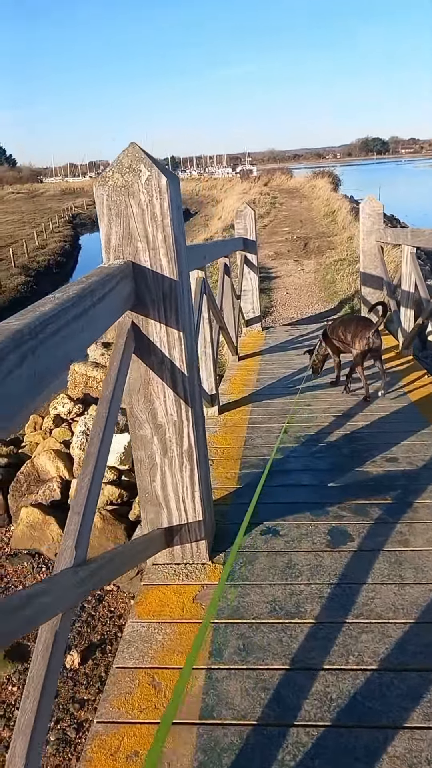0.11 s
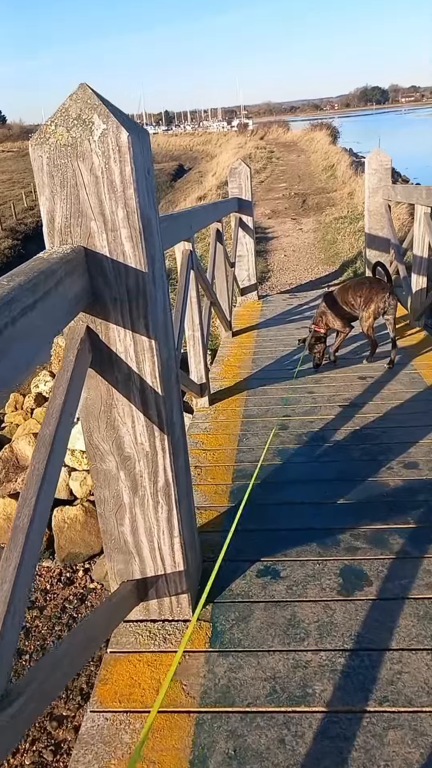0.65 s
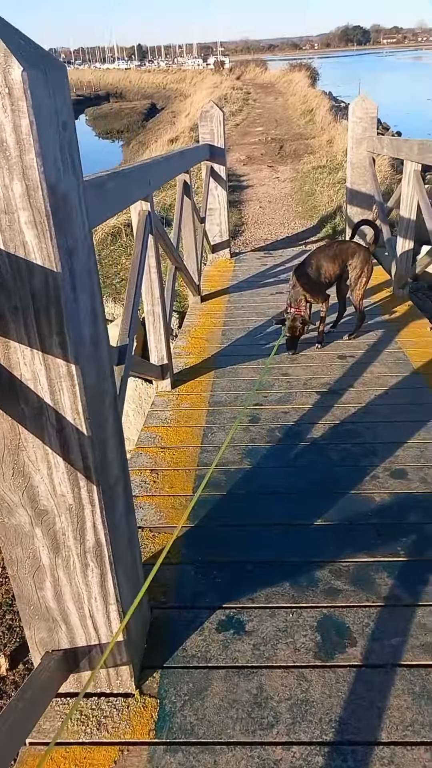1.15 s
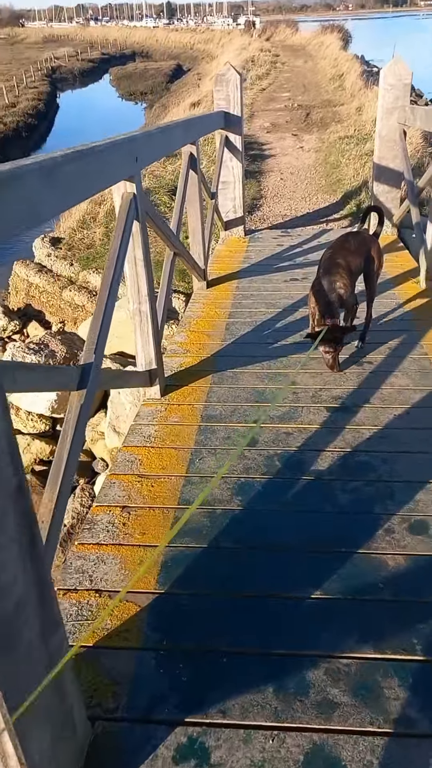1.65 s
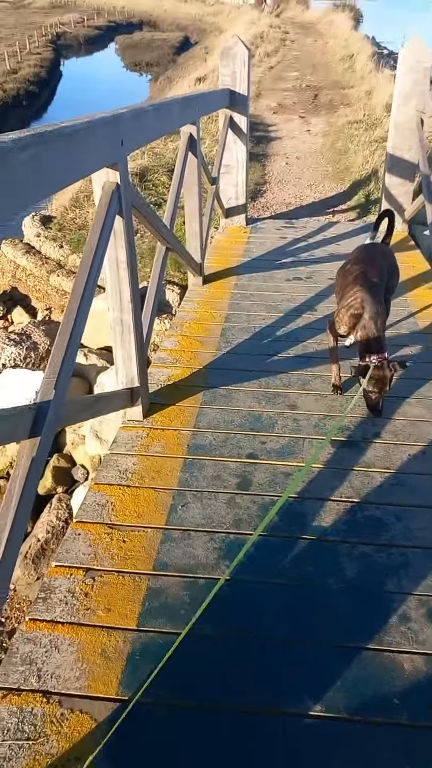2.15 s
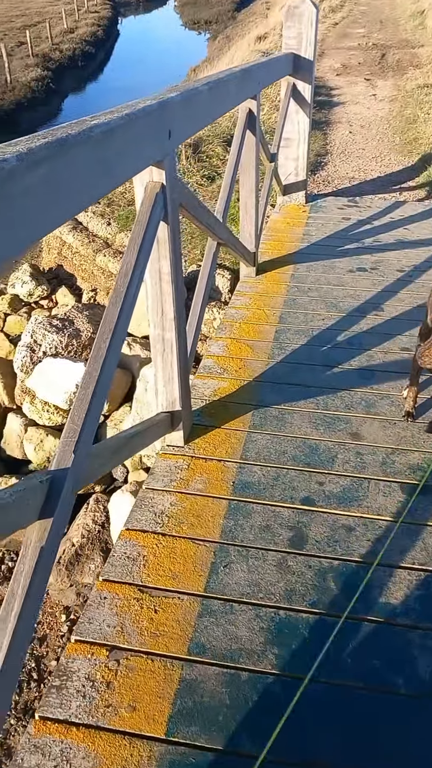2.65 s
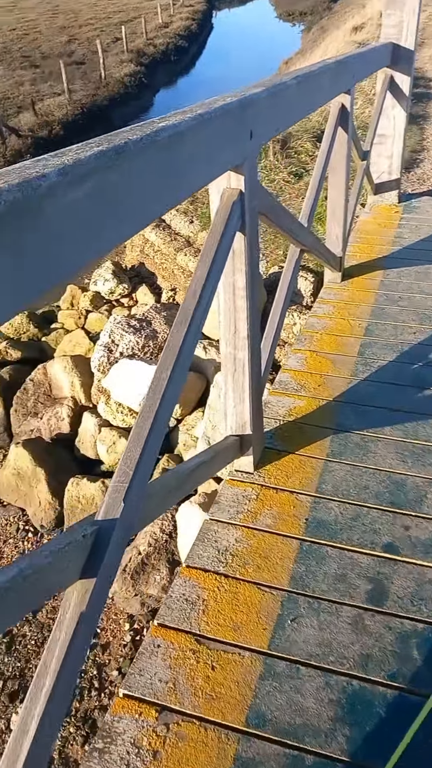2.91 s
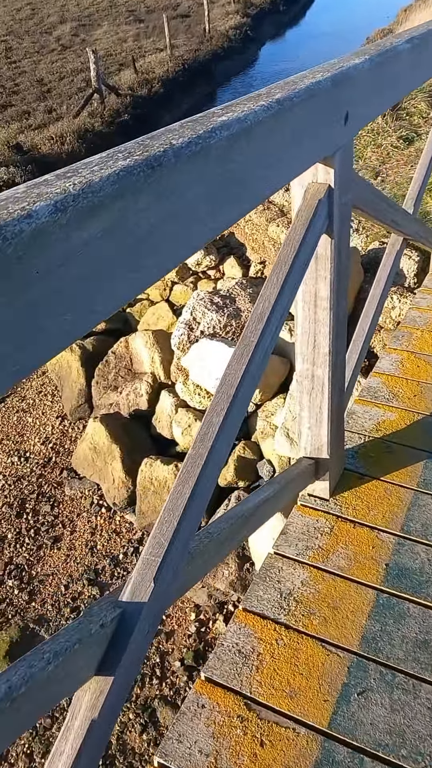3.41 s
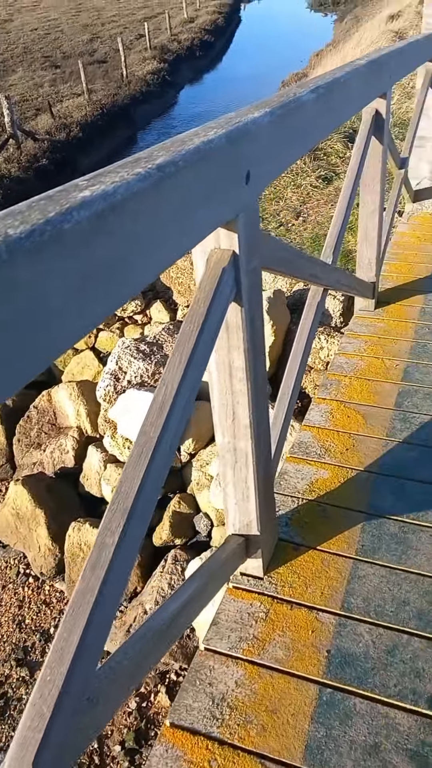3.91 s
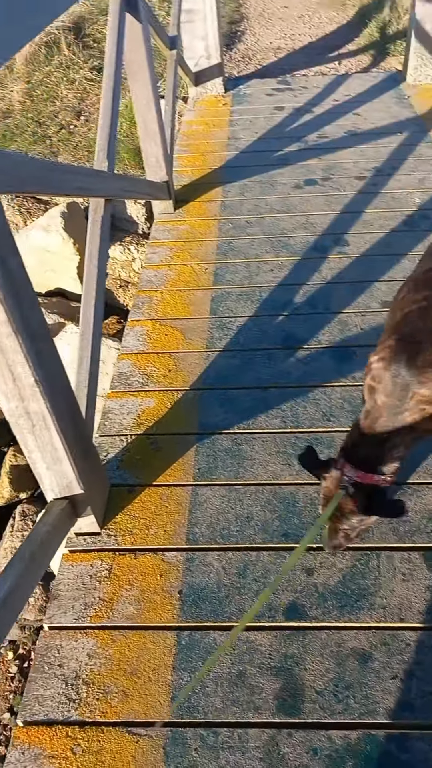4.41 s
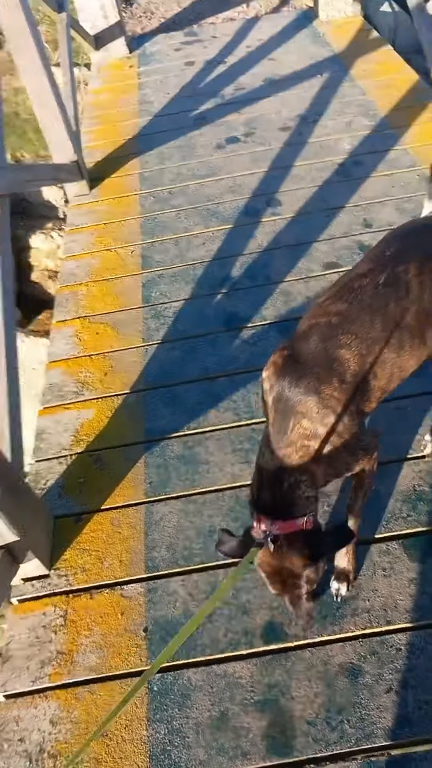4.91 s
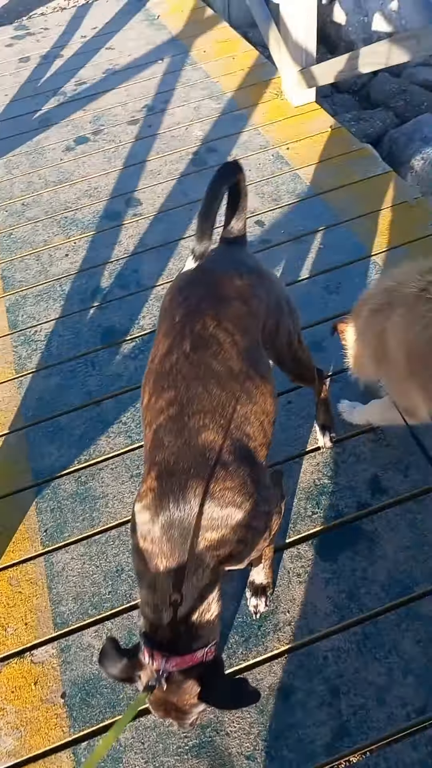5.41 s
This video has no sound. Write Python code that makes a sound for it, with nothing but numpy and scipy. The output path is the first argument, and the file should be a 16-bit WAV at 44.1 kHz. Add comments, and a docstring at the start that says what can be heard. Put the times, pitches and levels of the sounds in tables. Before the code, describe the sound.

Handheld close stereo sound, shaded on the left: hissy fabric and gritty scuffing stop and start over a faint low outdoor hum. Boards thud softly underfoot, a dog's claws and metal clasp click, and one claw scrapes finely before two seconds. Distant piping birds are heard early. After a sparser middle, heavy rubbing dominates late, then falls away, leaving faint paw taps and a crisp click.

```python
"""A walker follows a dog over a wooden footbridge: two microphones, the left shaded, so later and duller.
From the start cloth and soles rub as swelling friction noise, and planks thud as damped modes over a low outdoor hum.
Next thin whistles, perhaps shore birds, glide as sines over a blur of band noise; claws and the lead's clasp tick
as struck resonances. About a third of the way in a claw drags as ringing grains; paws tap paired board modes
then and again later. The whistles fade out, and the rubbing is strongest late."""
import sys
import numpy as np
from scipy import signal
from scipy.fft import rfft, irfft, next_fast_len
from scipy.io import wavfile
from scipy.ndimage import uniform_filter1d, map_coordinates

SR = 44100
rng = np.random.default_rng(int(sys.argv[2]) if len(sys.argv) > 2 else 0)


def decibels_to_gain(level_db):
    """Convert a level in decibels to a linear amplitude gain (20 dB per decade)."""
    exponent = np.asarray(level_db, float) / 20
    return 10 ** exponent


def store_pcm(level_fs):
    """Save levels as 16-bit WAV."""
    pcm = np.round(np.clip(level_fs, -1, 1) * 32767).astype(np.int16)
    wavfile.write(sys.argv[1], SR, np.atleast_2d(pcm).T)


N = 244755

# Footfalls on the planks: start_s, level_db, pitch_hz, rattle_db (over the thud)
FOOTFALLS = [(0.021, -41.5, 227, -30), (0.7393, -45, 254, -10.5), (0.763, -46, 214, -20),
             (0.799, -58, 120, 2), (1.551, -54.5, 193, -9), (2.1907, -47.5, 431.4, -8.5),
             (2.208, -49.5, 202, -15), (2.237, -52, 205, -18), (2.754, -46, 86, -20),
             (2.787, -46.5, 98, -15.5), (4.036, -53, 180, -13), (5.344, -57.5, 76.5, -18)]
BRISK_DB = -58.5  # hiss level of a brisk stroke, the reference for colour and loading


def unit(x):
    """Normalization: scales a signal to rms 1."""
    return x / np.sqrt(np.mean(x ** 2) + 1e-20)


def along(points, hz):
    """Spectral envelope: interpolates (frequency_hz, value) points on a log-frequency axis."""
    point_hz, value = np.transpose(points)
    return np.interp(np.log(hz + 1), np.log(point_hz + 1), value)


def curves(rows, **ends):
    """Linear interpolation: one value per sample for each column after the time."""
    time_s, *columns = np.transpose(rows)
    return [np.interp(np.arange(N) / SR, time_s, column, **ends) for column in columns]


def wobble(rate_hz):
    """Slow random modulation: a smooth curve through normal random knots, rate_hz of them a second."""
    knots = rng.standard_normal(int(N * rate_hz / SR) + 4)
    return map_coordinates(knots, [np.arange(N) * rate_hz / SR])


def filtered(x, response):
    """Linear filtering: multiplies the spectrum by a complex response of frequency."""
    size = next_fast_len(x.shape[-1] + 4096)
    spectrum = rfft(x, size) * response(np.fft.rfftfreq(size, 1 / SR))
    return irfft(spectrum, size)[..., :x.shape[-1]]


def resonance(hz, width_hz):
    """Damped oscillator: a causal band-pass response of peak gain 1."""
    return lambda f: 1j * f * width_hz / (hz * hz - f * f + 1j * f * width_hz)


def ramp(start_s, stop_s, rise_per_s, fall_per_s):
    """Piecewise-linear envelope: 0 between two times, sloping downward before and after."""
    t = np.arange(N) / SR
    return -rise_per_s * np.maximum(start_s - t, 0) - fall_per_s * np.maximum(t - stop_s, 0)


def to_left(x, lag_s=0.000362):
    """Acoustic shadow: the longer path delays the sound and the shade dulls it."""
    # Left over right: frequency_hz, level_db
    shade = [(100, 0.5), (400, -2), (1300, -3), (2400, -2.5), (4400, -7), (8000, -10.5), (8800, -7),
             (10000, -25), (15000, -19)]
    return filtered(x, lambda hz: decibels_to_gain(along(shade, hz)) * np.exp(-2j * np.pi * hz * lag_s))


def rush(spectrum, grain_db):
    """Partly coherent noise: uneven tiny grains at both microphones, whose mean has rms 1."""
    # Left-right likeness before the shading: frequency_hz, coherence (0 to 1)
    alike = [(100, .92), (600, .78), (1500, .68), (2700, .4), (4000, .24), (15000, .12)]
    grain_gain = decibels_to_gain(grain_db * (wobble(350) + 1.08 * wobble(14)))
    right, other = rng.standard_normal((2, N)) * grain_gain

    def shared(hz):
        return np.clip(along(alike, hz), 0, 1)

    common = filtered(right, shared)
    separate = filtered(other, lambda hz: np.sqrt(1 - shared(hz) ** 2))
    left = to_left(common + separate)
    pair = filtered(np.array([left, right]), lambda hz: decibels_to_gain(along(spectrum, hz)))
    return pair / np.sqrt(np.mean(pair.mean(0) ** 2))


def rubbing(hiss_db, body_db):
    """Friction noise: cloth and soles catch and slip, swaying five bands and sparse grit together."""
    # Bands of the friction noise: frequency_hz, level_db
    hiss_bands = [(1200, -28.5), (2400, -16), (3300, -10), (4200, -6.5), (5300, -12), (6500, -4.5),
                  (7700, -1.5), (8300, -7), (9000, -48), (11000, -12.5)]
    body_bands = [(150, -33), (280, -12.5), (580, 3), (1000, 1.5), (1350, 2.5), (2000, -17.5)]
    rasp_bands = [(1100, -19.5), (1500, 0), (1900, -2), (2600, -3), (3300, -6), (4500, -21)]
    fizz_bands = [(7000, -40), (8800, -9), (10500, -7), (12000, -4), (13400, 0), (14500, -1.5),
                  (15600, -1.5)]
    swish_bands = [(3300, -46), (4300, -1), (5200, 3.5), (6000, 0.5), (7000, -6)]
    # Cloth turning against the microphone:
    # time_s, fizz_db and swish_db (over the hiss, for a brisk stroke), rasp_db (over the body)
    cloth_turn = [(0.0, 3, 8, 10), (.12, -1.5, -2.5, 0), (.28, -3, 5.5, 5.5), (.5, -5, -4, 0.5),
                  (.75, 0.5, -4, 2), (1.1, 0, -4, 5), (1.9, 1.5, -2.5, 1.5), (2.2, 1.5, -8.5, 0.5),
                  (2.5, -6, 3, 4), (2.8, 1.5, -3.5, 2), (3.15, 5, -2.5, 4), (3.4, -3, -4.5, -8),
                  (3.7, 3.5, -1, 5), (3.95, 3, -4, 6), (4.5, 0.5, -3.5, -1.5), (5.5, 6, 0.5, -1)]
    fizz_db, swish_db, rasp_db = curves(cloth_turn)
    over_brisk_db = hiss_db - BRISK_DB
    fizz_db = fizz_db + 0.2 * over_brisk_db  # stronger strokes fizz more
    swish_db = swish_db - 0.17 * over_brisk_db  # and swish less
    catch_db = 0.75 * wobble(30) + 0.9 * wobble(90)

    body = rush(body_bands, grain_db=0.5) + decibels_to_gain(rasp_db) * rush(rasp_bands, grain_db=1.6)
    parts = rush(hiss_bands, grain_db=1.0) + decibels_to_gain(body_db - hiss_db - 3.5) * body
    parts += decibels_to_gain(fizz_db) * rush(fizz_bands, grain_db=-0.5)
    parts += decibels_to_gain(swish_db) * rush(swish_bands, grain_db=1.0)

    # Single grains of sand crack, about 120 a second
    cracks = (rng.random(N) < 120 / SR) * rng.standard_normal(N)
    grit = 0.17 * unit(filtered(cracks, lambda hz: decibels_to_gain(along(hiss_bands, hz))))
    return decibels_to_gain(hiss_db + catch_db) * (parts + [to_left(grit), grit])


def strokes():
    """Power addition: levels in dB of hiss and body, all strokes over a rustle that never stops."""
    # Strokes that swell or sink, then stop short:
    # stop_s, hiss_db (at the stop), length_s, swell_db, body_db (over the hiss)
    stroke_rows = [(0.105, -46, 0.074, 6, -10), (0.174, -49, 0.05, -1.5, -7.5), (0.391, -50, 0.18, 5.5, -4),
                   (0.487, -62, 0.064, -3.5, 0), (0.804, -45.5, 0.19, 16, -12),
                   (1.016, -64, 0.086, -2, -4.5), (1.246, -66, 0.22, -2, -6),
                   (1.481, -46.5, 0.19, 15, -16.5), (1.545, -57, 0.031, -7.5, -13),
                   (1.723, -57.5, 0.069, 5, -7.5), (1.806, -56.5, 0.025, 2.5, -4),
                   (2.21, -50, 0.31, 16.5, -8), (2.5, -54, 0.18, 4.5, -8.5),
                   (2.63, -68.5, 0.072, -6.5, -5.5), (2.82, -52.5, 0.065, 13, -13),
                   (3.02, -60, 0.15, 11, -13), (3.224, -65.5, 0.072, -4, -20),
                   (3.918, -46.5, 0.23, 13, -10.5), (4.106, -44.5, 0.062, 5, -9),
                   (4.346, -42.5, 0.2, 3.5, -8), (4.758, -42.5, 0.43, 2, -7), (4.913, -50.5, 0.14, 4, -1),
                   (5.263, -70, 0.22, 0, -11), (5.372, -67, 0.082, 0.5, -2)]
    onset_db_per_s, lift_db_per_s = 205, 255
    rest_db, rest_body_db = -69.5, -6  # hiss of the resting rustle, and its body over that hiss
    hiss_power, body_power = decibels_to_gain(2 * rest_db), decibels_to_gain(2 * (rest_db + rest_body_db))
    for stop_s, stop_db, length_s, swell_db, body_db in stroke_rows:
        to_go = np.clip((stop_s - np.arange(N) / SR) / length_s, 0, 1)
        slopes_db = ramp(stop_s - length_s, stop_s, onset_db_per_s, lift_db_per_s)
        power = decibels_to_gain(2 * (stop_db - swell_db * to_go + slopes_db))
        hiss_power = hiss_power + power
        body_power = body_power + power * decibels_to_gain(2 * body_db)
    return 10 * np.log10(hiss_power), 10 * np.log10(body_power)


def ticks():
    """Impulse response: a sharp blow and its grit ring, with a bright edge and a wooden knock."""
    # Claw and clasp ticks: start_s, ring_peak_db, pitch_hz,
    # scatter_db and knock_db (relative settings, each offset below)
    tick_rows = [(0.743, -26, 6300, -16, -9), (0.982, -37, 4330.0, -20, -3),
                 (1.0128, -29.5, 5100, -15, -28), (1.0615, -33, 5940, -3, -13),
                 (1.086, -37, 4360, -13, -13), (1.6962, -28.5, 6300, -13, -11),
                 (1.7044, -31, 7110.0, -19, -13), (1.709, -39, 6280.0, -21, -20),
                 (1.738, -24.5, 6450.0, -30, -32), (1.758, -42, 7300, -28, -21),
                 (1.789, -29.5, 5930.0, 0, -14), (1.799, -38, 5920.0, 0, -18),
                 (1.84, -38, 6310.0, -15, -15), (1.8916, -34.5, 6800, -28, -27),
                 (2.009, -32.5, 6400, -7, -10), (2.3007, -36.5, 5300, -3, -3),
                 (2.879, -31.5, 4600, -13.5, -9), (3.0465, -29.5, 4640, -15.5, -7),
                 (3.2326, -35, 5550, -3, -9), (3.4668, -34.5, 5600, -12, -18), (3.4721, -41, 5500, -16, -7),
                 (3.4835, -28.5, 6700, -8, -19), (3.487, -39.5, 6900, -9, -6),
                 (3.49, -40.5, 6700, -4, -3.5), (3.917, -21.5, 5470, -14, -24),
                 (4.0234, -30, 7560.0, 2, -11.5), (5.338, -42, 5300, -1, -9),
                 (5.5283, -26.5, 5300, -12, -36), (5.5287, -30, 5250, -5, -12)]
    out, t = np.zeros((2, N + SR)), np.arange(SR // 10) / SR
    for start_s, peak_db, hz, scatter_db, knock_db in tick_rows:
        scatter_gain = decibels_to_gain(scatter_db - 8.0 - 60 * t / 0.029)  # falls 60 dB in 0.029 s
        blow = scatter_gain * rng.standard_normal((2, len(t))) * rng.exponential(size=len(t))
        blow[:, 0] = 1  # the blow itself
        ring = filtered(blow, lambda f: resonance(hz, 3000)(f) ** 2 + 0.45 * resonance(7600, 900)(f))
        edge = 0.36 * filtered(blow, lambda f: resonance(10500, 5000)(f) ** 2)
        knock = decibels_to_gain(knock_db + 5) * filtered(blow, lambda f: resonance(1800, 1300)(f) ** 2)
        tick = decibels_to_gain(peak_db) * (ring + edge + knock) / np.abs(ring[1]).max()
        out[:, round(start_s * SR):][:, :len(t)] += tick
    return np.array([to_left(out[0, :N]), out[1, :N]])


def footfalls():
    """Modal damping: each footfall excites a dull decaying plank tone and a woody noise rattle."""
    thuds, t = np.zeros(N + SR), np.arange(SR // 4) / SR
    for start_s, level_db, hz, rattle_db in FOOTFALLS:
        # Falls 60 dB in 18 cycles at any pitch
        envelope = (1 - np.exp(-t / 0.0016)) * decibels_to_gain(-60 * t * hz / 18)
        thud = envelope * np.sin(2 * np.pi * hz * t)
        rattle = filtered(rng.standard_normal(len(t)), lambda f: resonance(480, 500)(f) ** 2)
        rattle = decibels_to_gain(rattle_db - 60 * t / 0.25) * unit(rattle)
        thuds[round(start_s * SR):][:len(t)] += decibels_to_gain(level_db) * (thud + rattle)
    return np.array([to_left(thuds[:N]), thuds[:N]])


def taps():
    """Beating modes: each paw tap, low and ahead, rings two close board resonances."""
    # Paws on the boards: start_s, level_db, pitch_hz
    tap_rows = [(1.789, -49, 1220), (1.796, -52, 1196), (3.491, -53, 1320), (5.274, -61, 650),
                (5.358, -61, 650), (5.378, -64, 530)]
    out, t = np.zeros(N + SR), np.arange(SR // 5) / SR
    for start_s, level_db, hz in tap_rows:
        upper = np.sin(2 * np.pi * hz * 1.09 * t + rng.uniform(0, 2 * np.pi))
        pair = np.sin(2 * np.pi * hz * t) + 0.44 * upper
        decay = decibels_to_gain(level_db - 60 * t * hz / 64)  # falls 60 dB in 64 cycles
        out[round(start_s * SR):][:len(t)] += decay * (1 - np.exp(-t / 0.0013)) * pair
    return np.array([to_left(out[:N], lag_s=0.0001), out[:N]])  # nearly straight ahead


def scrape():
    """Resonant friction: uneven grains excite the claw's narrow ring, growing and then trailing off."""
    # A claw dragged across grit: start_s, peak_s, level_db, pitch_hz
    drag = (1.3, 1.82, -50.5, 5850)
    start_s, peak_s, level_db, hz = drag
    grains = rng.standard_normal(N) * decibels_to_gain(2.5 * wobble(600))
    ring = unit(filtered(grains, resonance(hz, 600)))
    swell = np.clip((np.arange(N) / SR - peak_s) / (peak_s - start_s), -1, 0)
    ring = ring * decibels_to_gain(level_db + 5 * swell + ramp(start_s, peak_s, 900, 520))
    return np.array([to_left(ring), ring])


def birds():
    """Tones over band noise: breathy whistles overlap above the blur of many more in the same band."""
    # Blur of far whistles: time_s, level_db
    whirr = [(.4, -69), (1.45, -61.5), (1.62, -63), (1.9, -65.5), (2.45, -63), (2.65, -71.5), (2.85, -67.5),
             (3.3, -77), (3.45, -75.5), (3.75, -71)]
    # Band of the blur: frequency_hz, level_db
    chorus = [(1300, -23), (1550, -8.5), (1700, -1.5), (1950, -3), (2150, -8.5), (2500, -32.5)]
    # Whistled glides: start_s, length_s, from_hz, to_hz, level_db
    glide_rows = [(0.566, 0.042, 1700, 1840, -62), (0.61, .13, 1820, 1925, -62),
                  (0.747, 0.054, 1966, 2000, -52.5), (0.8, 0.064, 2000, 1870, -63),
                  (0.862, 0.12, 1880, 1840, -64), (1.028, 0.043, 2050, 2140, -63),
                  (1.051, .05, 1700, 1660, -63), (1.085, 0.048, 2060, 1877, -59),
                  (1.141, .045, 1878, 2010, -61), (1.17, 0.033, 1600, 1713, -61),
                  (1.206, .03, 1750, 1717, -53), (1.296, .05, 1565, 1807, -54.5),
                  (1.348, 0.051, 1822, 1650, -53.5), (1.409, 0.072, 1640, 1960, -49),
                  (1.489, .07, 1960, 1600, -52), (1.56, 0.045, 1600, 1587, -58),
                  (1.918, 0.031, 1683, 1950, -58), (1.95, 0.053, 1956, 1805, -56.5),
                  (2.004, 0.034, 1817, 2020, -55), (2.06, .05, 1560, 1720, -57.5),
                  (2.138, 0.035, 2100, 1990, -61), (2.228, 0.041, 1733, 1655, -55),
                  (2.27, 0.029, 1700, 1843, -56), (2.312, 0.073, 1650, 1606, -58),
                  (2.781, .07, 1660, 1775, -63)]
    join_s, join_hz = 0.03, 70  # glides this close belong to one whistle
    whirr_db, = curves(whirr, left=-90, right=-90)
    calls = [[glide_rows[0]]]
    for last, glide in zip(glide_rows, glide_rows[1:]):
        gap_s = abs(glide[0] - last[0] - last[1])
        leap_hz = abs(glide[2] - last[3])
        if gap_s < join_s and leap_hz < join_hz:
            calls[-1].append(glide)
        else:
            calls.append([glide])
    tone = sum(whistle(call) for call in calls)
    blur = decibels_to_gain(whirr_db + 1.5 * wobble(25)) * rush(chorus, grain_db=2)
    return blur + [to_left(tone, lag_s=0.00045), tone]


def whistle(glides):
    """Frequency modulation: joined glides of one throat form a sine that trembles in size and pitch."""
    points = []
    for start_s, length_s, from_hz, to_hz, _ in glides:
        points += [(start_s, from_hz), (start_s + length_s, to_hz)]
    hz, = curves(sorted(points))
    trembling_hz = uniform_filter1d(hz, size=500) * (1 + 0.006 * wobble(60))
    turns = np.cumsum(trembling_hz) / SR
    gains = [fading(start_s, length_s, level_db) for start_s, length_s, _, _, level_db in glides]
    tone = np.max(gains, axis=0) * np.sin(2 * np.pi * turns)
    return tone * decibels_to_gain(2 * wobble(45))


def fading(start_s, length_s, level_db):
    """Amplitude envelope: a gain held between two short linear fades."""
    fade_s = 0.0085
    return decibels_to_gain(level_db) * np.clip(1 + ramp(start_s, start_s + length_s, 1 / fade_s, 1 / fade_s), 0, 1)


def shaking_planks(hiss_db):
    """Forced vibration: walking stirs a low plank noise, which starts at once under each footfall."""
    # Band of the shaking: frequency_hz, level_db
    shake_bands = [(90, -8), (140, -4.5), (200, 1), (300, -4), (500, -9.5), (900, -21)]
    gain = loading(-88, -69.5, -11.5, 0.003, shake_bands, hiss_db)
    unrest = decibels_to_gain(2.24 * wobble(20) + 2.7 * wobble(5))
    return gain * unrest * rush(shake_bands, grain_db=-1.5)


def low_hum(hiss_db):
    """Narrow-band noise: a low outdoor hum follows the rubbing and swells into each footfall."""
    # Band of the hum: frequency_hz, level_db
    hum_bands = [(25, -48), (40, -40), (60, -2), (85, -1.5), (110, -5.5), (140, -9.5), (250, -36)]
    gain = loading(-72.5, -67.5, -4.5, 0.05, hum_bands, hiss_db)
    return gain * decibels_to_gain(1.6 * wobble(6)) * rush(hum_bands, grain_db=0)


def loading(rest_db, rub_db, step_db, rise_s, spectrum, hiss_db):
    """Power addition: gain of a low layer at rest, under the walker's motion and around each footfall."""
    follows = 0.38  # dB for each dB of rubbing over a brisk stroke
    load_s, unload_s = 0.051, 0.04  # hold, then time to fall 10 dB; rise_s is the time to rise 10 dB
    power = decibels_to_gain(2 * rest_db) + decibels_to_gain(2 * (rub_db + follows * (hiss_db - BRISK_DB)))
    for start_s, level_db, hz, _ in FOOTFALLS:
        swell_db = ramp(start_s, start_s + load_s, 10 / rise_s, 10 / unload_s)
        # The plank pitch sets how strongly the footfall feeds this band
        power = power + decibels_to_gain(2 * (level_db + step_db + along(spectrum, hz) + swell_db))
    return np.sqrt(power)


def scene():
    """Superposition: all sources add at the two microphones."""
    hiss_db, body_db = strokes()
    near = rubbing(hiss_db, body_db) + ticks() + footfalls() + taps() + scrape()
    return near + birds() + shaking_planks(hiss_db) + low_hum(hiss_db)


def band_limit(x):
    """A steep low-pass at the top of the band."""
    return signal.sosfilt(signal.butter(12, 16660, fs=SR, output="sos"), x)


def record(dry):
    """Band limiting: a second-order bass cut and a sharp upper limit."""
    bass_cut_hz, top_hz = 42, 15780
    mix = filtered(dry, lambda hz: (hz < top_hz) * (1j * hz / (bass_cut_hz + 1j * hz)) ** 2)
    return band_limit(mix)


dry = scene()
out = record(dry)
store_pcm(out)
```